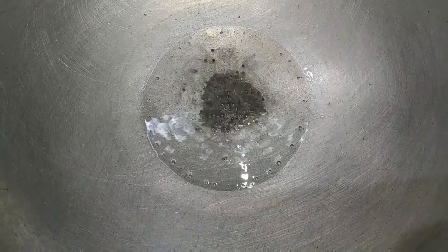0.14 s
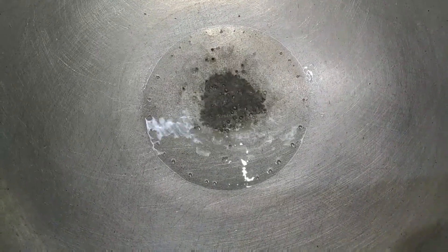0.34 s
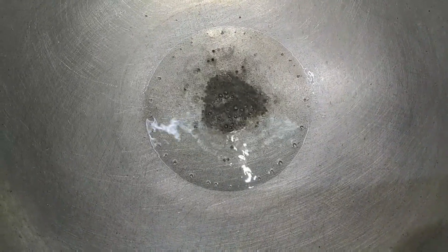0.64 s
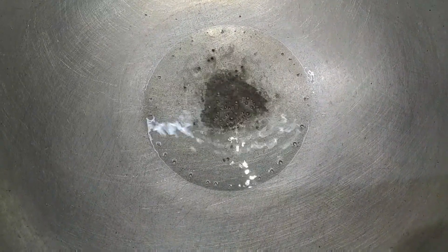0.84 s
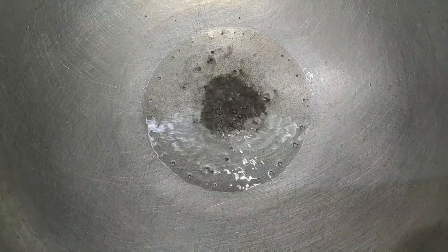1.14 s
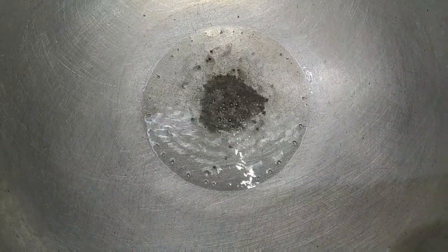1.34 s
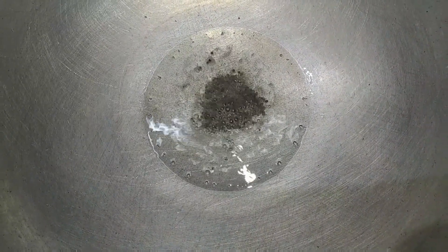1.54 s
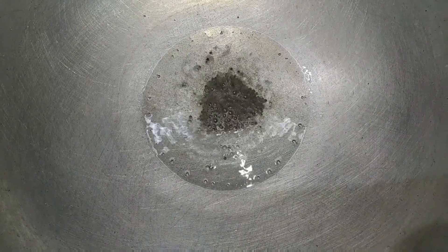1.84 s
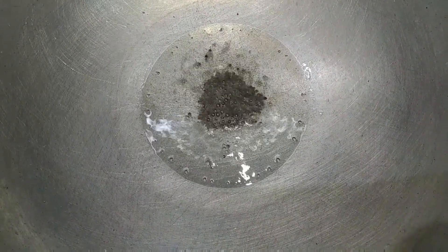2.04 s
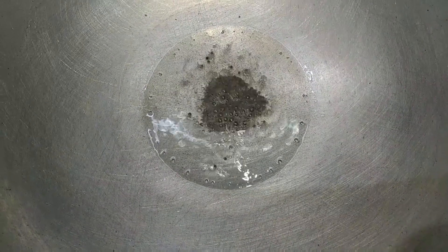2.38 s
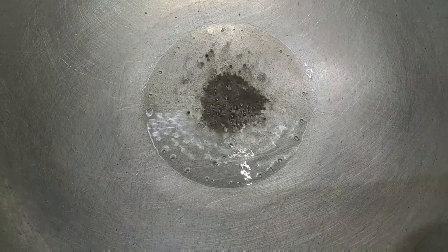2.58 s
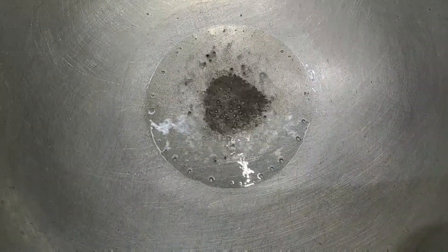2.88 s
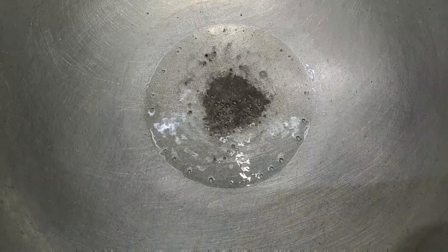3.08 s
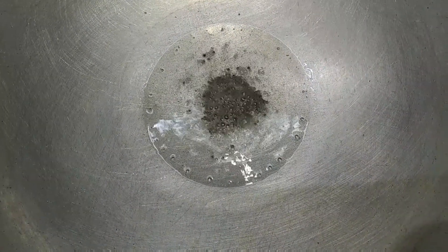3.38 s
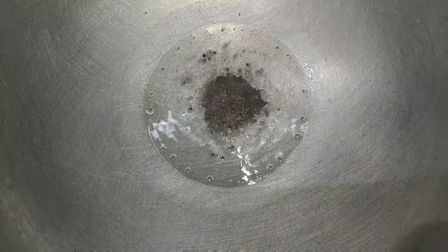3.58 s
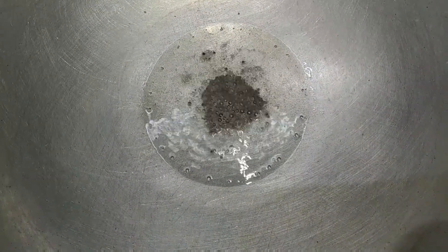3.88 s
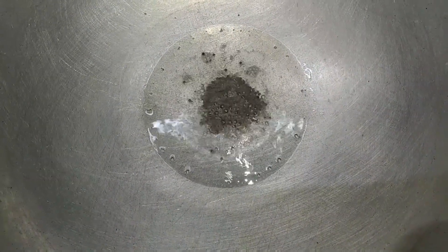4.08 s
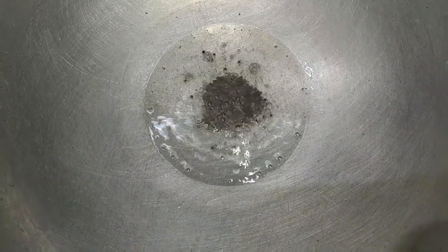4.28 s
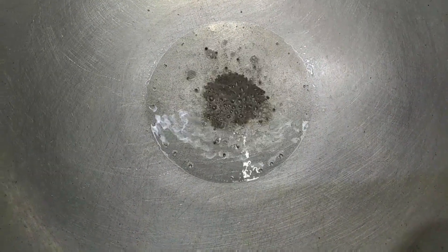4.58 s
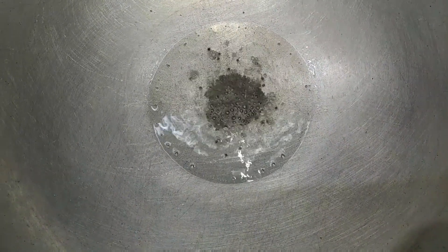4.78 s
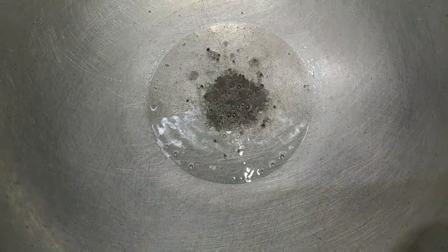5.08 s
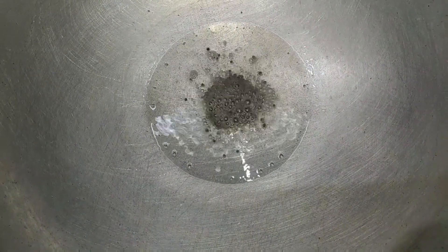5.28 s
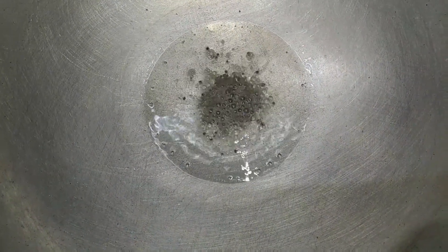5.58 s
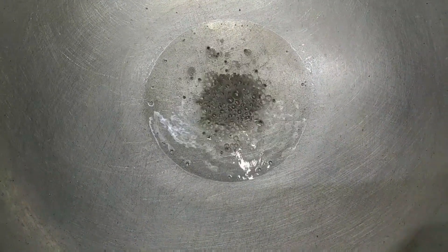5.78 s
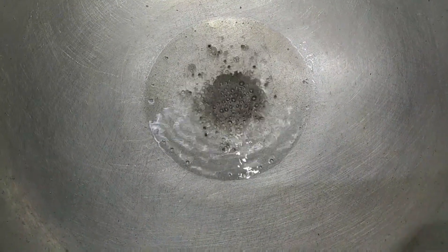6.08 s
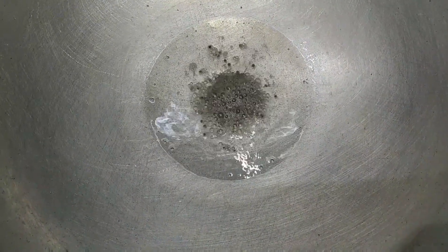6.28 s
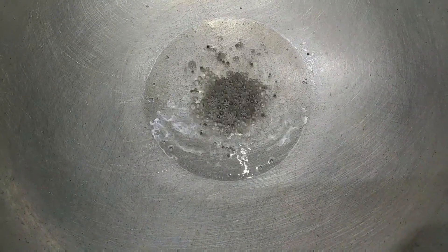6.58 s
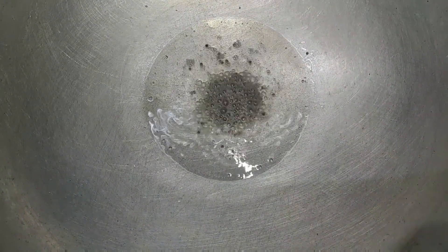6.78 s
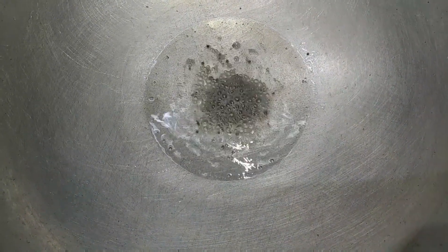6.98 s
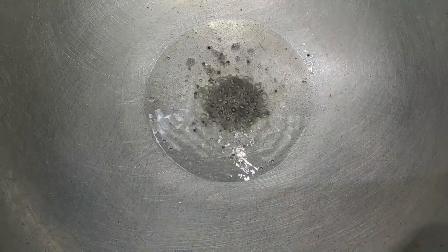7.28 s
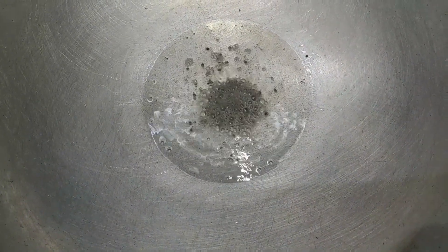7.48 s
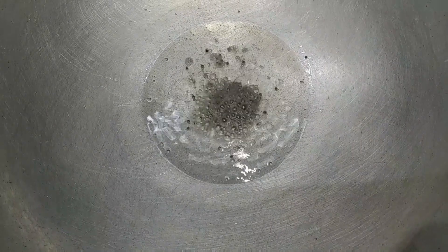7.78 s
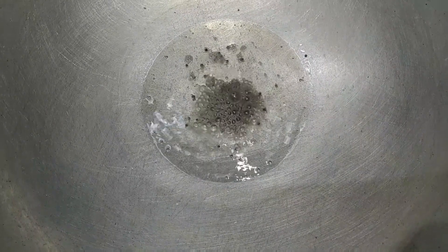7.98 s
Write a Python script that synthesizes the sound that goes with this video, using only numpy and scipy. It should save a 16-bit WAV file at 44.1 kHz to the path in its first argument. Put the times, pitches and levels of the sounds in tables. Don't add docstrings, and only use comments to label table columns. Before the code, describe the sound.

Seeds pop in hot oil in a deep steel pan, sparse faint ticks over soft fizz growing into dense, loud, ringing crackle.

```python
import sys
import numpy as np
from scipy import signal
from scipy.fft import rfft, irfft
from scipy.io import wavfile
from scipy.ndimage import uniform_filter1d

SR = 44100
rng = np.random.default_rng(int(sys.argv[2]) if len(sys.argv) > 2 else 0)


def level_to_linear(level):
    exponent = np.asarray(level, float) / 20
    return 10 ** exponent


def output_pcm(signal):
    pcm = np.clip(np.atleast_2d(signal).T, -1, 1) * 32767
    wavfile.write(sys.argv[1], SR, np.round(pcm).astype(np.int16))


N = 358974

# pitch_hz, level_db (per Hz)
ROOM_COLOUR = [(8.8, -26), (15, 7), (54, -2.5), (148, -2.5), (294, -4), (452, -7.5), (824, -18.5),
               (1230, -13.5), (2060, -13.5), (3750, -16.5), (8360, -16.5), (9650, -7.5), (14000, -76)]
# pitch_hz, width_hz, level_db
HUM_TONES = [(297.4, 12, -73.5), (842, 76, -76)]
# start_s, firing_hz, load_db
FAR_ENGINE = [
    (0.0, 52.6, -73),
    (0.13, 49.9, -76),
    (2.72, 46.44, -69.5),
    (3.63, 49.8, -67),
    (4.87, 49.5, -65.5),
    (6.03, 46.5, -60.5),
    (6.37, 47, -72),
    (6.57, 52.8, -90.5),
    (6.98, 46.7, -82.5),
    (8.14, 43.4, -86),
]
# pitch_hz, likeness (0 to 1)
LEFT_RIGHT_LIKENESS = [(25, 0.7), (125, 1), (250, 0.91), (500, 0.46), (1000, 0.029), (14000, 0.0)]
# start_s, level_db
JET_LEVEL = [(0.0, -59), (0.61, -62), (1.06, -61.5), (1.92, -65), (2.18, -63), (2.79, -70), (4.03, -73.5),
             (4.28, -67), (5.05, -69), (5.76, -62.5), (6.64, -61), (6.82, -58), (7.37, -59.5), (7.8, -56.5),
             (8.14, -55)]
# start_s, level_db
FRYING = [(0.0, -63), (0.68, -66.5), (1.02, -60), (1.31, -63), (1.9, -60.5), (2.27, -51.5), (2.47, -61.5),
          (3.9, -60.5), (4.22, -56.5), (4.85, -59), (5.51, -56), (6.0, -54.5), (6.2, -54.5), (6.53, -54.5),
          (6.87, -53.5), (7.3, -57), (8.14, -52.5)]
# pitch_hz, level_db (per Hz)
FIZZ_BODY_COLOUR = [(350, -51), (600, -8.5), (2040, 2), (2260, 2), (3410, 1.5), (4550, 7), (7000, -38),
                    (9100, 3), (15400, -120)]
# pitch_hz, level_db (per Hz)
FIZZ_TOP_COLOUR = [(2350, -53), (4000, -34), (4940, 3.5), (9390, 3), (13000, -4), (13500, -67),
                   (14600, -90)]
# pitch_hz, fade_s (to -60 dB)
KITCHEN_FADE = [(500, 0.17), (2000, 0.27), (5500, 0.39), (12000, 0.057)]
# pitch_hz, level_db (per Hz)
BURST_COLOUR = [(150, -9.5), (250, -11), (768, -8.5), (865, -10.5), (1570, 0.5), (2020, -1.5), (2240, 0.5),
                (2840, -3.5), (4580, -2), (10200, -10), (13300, -15), (14600, -32), (17000, -66)]
# pitch_hz, width_hz, level_db
STEEL_NOTES = [(1700, 670, -11), (2190, 40, -2), (2590, 45, 0), (3530, 620, -4.5), (4300, 60, 0.5),
               (4640, 230, -1), (5700, 160, -8.5), (5100, 120, -2.5)]
# start_s, peak_db, pitch_hz (hollow note), brightness_db
DRY_SNAPS = [(0.3799, -38.5, 4550, -10), (0.7792, -30, 4400, -12.5), (0.863, -30, 6940, -10),
             (1.7217, -43, 2150, -25), (3.1542, -24.5, 4350, -4.5), (3.2217, -26, 5040, -12.5),
             (3.5924, -34.5, 9100, -7), (4.3434, -19.5, 6840, -15.5), (4.484, -35, 4220, -4.5),
             (4.6755, -20, 4120, -10.5), (5.088, -28, 2380, -41), (5.6824, -28.5, 5500, -17),
             (6.1219, -30, 4540, -15), (6.188, -27, 2690, -10.5), (7.3101, -28, 1556, -28),
             (7.5548, -26, 7960, -1.5), (7.7093, -22.5, 2290, -19), (7.7457, -19.5, 4400, -19.5)]
# start_s, peak_db, pitch_hz (hollow note), brightness_db
FAINT_TICKS = [(0.331, -46, 2630, -18), (0.684, -56, 2010, -6), (1.626, -44.5, 4600, -7),
               (2.2865, -32, 9150, 8), (2.8338, -46, 4680, -9), (2.811, -45, 1900, -25),
               (2.873, -44, 4440, -10), (3.6342, -44.5, 1610, -22), (4.014, -48, 3990, -15),
               (4.3317, -36, 4680, -14), (4.5508, -40, 1700, -21), (4.6873, -35, 3640, -24),
               (4.839, -37.5, 2760, -19), (5.1941, -31.5, 3960, -19), (5.332, -57, 2980, -7),
               (5.377, -41, 1530, -22), (5.531, -28, 1620, -27), (6.2959, -30.5, 7500, -4),
               (6.336, -25, 3800, -20), (6.8208, -41, 7150, 4), (7.562, -35, 7320, -1),
               (7.699, -32.5, 2440, -25)]
# start_s, peak_db, pitch_hz (hollow note), brightness_db
WARMING_POPS = [(0.941, -35, 2360, -26), (1.2386, -43, 4000, -28), (1.545, -33, 4280, -18),
                (2.0954, -43, 8350, -6), (2.1186, -36, 9000, 5), (2.1386, -38, 2315, -25),
                (2.1504, -35, 4200, -26), (2.1652, -36.5, 8950, 5), (2.5458, -35.5, 4900, -15),
                (2.5938, -32.5, 2280, -15), (2.6972, -40.5, 2150, -33), (2.77, -45, 4470, -12),
                (2.799, -37, 8300, -11.5), (2.845, -34.5, 4590, -15), (3.2934, -41.5, 6230, 5),
                (3.376, -29, 3070, -21), (3.5613, -36.5, 6100, -18), (3.762, -34, 4490, -6),
                (4.0431, -26.5, 5050, -13.5), (4.2826, -30.5, 4750, -8.5), (4.316, -23.5, 2580, -12),
                (4.6494, -36.5, 4160, -16), (4.8476, -27.5, 4200, -11)]
# start_s, peak_db, pitch_hz (hollow note), brightness_db
HOT_POPS = [(5.0467, -30.5, 4500, -17), (5.231, -28.5, 5260, -18), (5.3558, -34, 2080, -31),
            (5.396, -22, 4240, -14.5), (5.4483, -30, 3620, -27), (5.4927, -24.5, 4400, -14),
            (5.587, -26, 5730, -19), (5.769, -30.5, 1520, -16), (6.072, -24, 3580, -15),
            (6.2243, -27, 4750, -28), (6.24, -24, 3800, -7.5), (6.6051, -30.5, 4170, -23),
            (6.6264, -29, 4400, -15), (6.6936, -19.5, 5640, -12), (6.7786, -22.5, 2700, -11.5),
            (7.0248, -28, 3040, -17), (7.1573, -27.5, 2730, -14), (7.419, -33, 1700, -28),
            (7.5837, -25.5, 4670, -16), (7.755, -26.5, 5000, -11), (7.7742, -35, 4540, -31),
            (7.8978, -28.5, 4200, -7)]
# start_s, peak_db, pitch_hz (hollow note), brightness_db
WET_SPITS = [(1.2263, -40, 5050, -27), (1.3789, -40, 3700, -31), (2.236, -36, 2354, 8),
             (2.2527, -33.5, 9200, 0), (2.2702, -36.5, 9100, 1), (2.3005, -37.5, 8800, -6),
             (2.3154, -38.5, 7250, -11), (3.899, -43.5, 1550, -19), (3.936, -29.5, 4640, -11),
             (4.0267, -36, 3530, -35), (4.3007, -33, 2654, -3), (4.421, -35, 5100, -17),
             (4.7071, -30, 4180, -10), (4.8159, -43, 1360, -16), (4.965, -36, 3520, -39),
             (5.2756, -35.5, 7700, -11.5), (5.4788, -23, 4600, -11), (5.9035, -31.5, 2330, -11),
             (6.2302, -19, 2190, -24.5), (6.7223, -31.5, 1540, -7), (6.9364, -31, 4700, -16),
             (7.3371, -32, 4640, -20), (7.7363, -28.5, 4510, -34), (8.0065, -35, 1468, -29),
             (8.0802, -32, 3190, -37), (8.1038, -34.5, 3430, -20), (8.1167, -35, 3630, -27)]
# start_s, peak_db, pitch_hz (hollow note), brightness_db, thump_db
BIG_BANGS = [(0.9824, -21, 2560, -7.5, -16.5), (1.0157, -17.5, 3830, -12.5, -16.5),
             (2.3969, -24.5, 2670, -11, -11), (2.639, -25, 2930, -20, -11.5),
             (4.1343, -13.5, 5270, -15, -16), (4.5551, -18.5, 2740, -10.5, -18.5),
             (4.8921, -21.5, 2260, -19, -13.5), (5.1144, -20, 2530, -12.5, -20.5),
             (5.548, -16.5, 2230, -12.5, -22.5), (5.6693, -19, 5830, -24, -24.5),
             (5.9349, -15, 5600, -11.5, -18.5), (6.023, -11, 4640, -11, -24.5),
             (6.3417, -18, 1830, -14.5, -13), (6.3927, -12, 3500, -13.5, -18),
             (6.8688, -16, 2600, -20.5, -17.5), (7.172, -23, 1610, -19, -11),
             (7.2714, -21.5, 1930, -20, -16), (7.467, -20, 2580, -21, -20),
             (7.621, -19.5, 4400, -15.5, -10.5), (7.8579, -15.5, 3600, -10, -16.5)]
# start_s, peak_db, pitch_hz (hollow note), brightness_db
FURTHER_SNAPS = [(2.2113, -43, 9300, -6), (2.3464, -37.5, 2500, -21), (2.3654, -38, 2700, -15),
                 (5.9863, -32, 1960, -16), (6.7, -31, 4600, -17), (6.351, -29, 5500, -22),
                 (6.9, -30.5, 4600, -15), (7.5924, -38, 4170, -12), (7.6304, -31.5, 3400, -17),
                 (6.9375, -29.5, 9000, -1), (4.1405, -24.5, 5000, -20), (6.0295, -23, 5000, -18),
                 (5.9405, -26, 5200, -20), (4.4, -38, 4100, -20), (7.4735, -28, 4000, -20),
                 (6.9445, -36, 5200, -18)]
# start_s, lower_hz, lower_db, upper_hz, upper_db
SPLIT_NOTES = [(0.9824, 4560, 3, 9200, 7), (1.0157, 1810, 8.5, 4480, 7), (2.3969, 2680, 2, 6550, 11),
               (2.639, 1590, 9, 4400, 6), (3.1542, 1210, -7, 7950, -6), (3.2217, 1300, -2, 6000, -3),
               (3.376, 1320, 3, 3350, -7), (3.936, 3050, 5, 4670, 13), (4.0431, 1960, 8, 5130, -1),
               (4.1343, 2250, 6, 5440, 0), (4.316, 2560, 15, 4100, 15.5), (4.3434, 2550, 6.5, 7200, 7),
               (4.5551, 2640, 7.5, 8230, 4.5), (4.674, 3400, 13, 4140, 14), (4.7071, 2600, 11.5, 4060, 18),
               (4.8921, 1760, 1, 8100, -4), (5.1144, 2560, -1, 4970, 4), (5.2306, 3320, 11.5, 5110, -17),
               (5.3955, 2700, 12.5, 4300, -8), (5.4788, 3640, 5, 4450, 8), (5.4933, 1750, -1, 6050, 0),
               (5.548, 1820, 11, 2180, 15), (5.587, 2130, 11, 6240, 15), (5.6693, 2580, 9, 5930, 9),
               (5.9349, 1890, 7.5, 5800, 3), (6.023, 4680, 8, 7400, 2), (6.0716, 1560, 12.5, 3800, -10.5),
               (6.188, 2660, 3, 7950, 2), (6.2302, 4600, -4, 8240, 2), (6.3417, 3500, 4, 4400, 10),
               (6.3927, 1560, 11.5, 4300, 1), (6.6928, 1880, 1, 2530, 10.5), (6.7785, 2520, -7, 7050, -1),
               (6.8688, 2450, -9, 4820, -5), (7.172, 1660, 9, 8200, 8), (7.2714, 1900, 9, 8260, -5),
               (7.467, 2500, 8.5, 4970, 12), (7.5835, 2000, 12, 4940, 4), (7.62, 1950, 15, 4300, 9),
               (7.8579, 2270, 6.5, 2820, 8)]
# start_s, length_share (of the spatter), room_db (reaching the walls)
PAN_SPOTS = [(0.9824, 1.1, -0.5), (1.0157, 1.27, -0.3), (2.3969, 1.1, -0.8), (2.639, 1.24, 0.1),
             (3.1542, 1.5, 1), (3.936, 0.87, -0.5), (4.1343, 1.15, -4.3), (4.3434, 1.2, -2),
             (4.5551, 0.86, -1.5), (4.6755, 1.1, 3.7), (4.8921, 0.93, 0.3), (5.1144, 1.2, 1.3),
             (5.3958, 1.1, -1), (5.4788, 0.89, 0), (5.548, 1.25, -4), (5.6693, 1.4, -1.5),
             (5.9349, 1.1, -2), (6.023, 0.95, -2.5), (6.072, 1.06, -2.3), (6.2302, 0.9, -5), (6.24, 1.4, 2),
             (6.3417, 1.4, -3.5), (6.3927, 0.74, -2.5), (6.6936, 0.86, -1.2), (6.7786, 0.98, -2.5),
             (6.8688, 1.06, 0.7), (7.172, 0.96, 1.7), (7.2714, 0.96, -1), (7.467, 1.37, -0.5),
             (7.5832, 0.76, -2.5), (7.62, 0.88, -2.5), (7.7457, 0.91, -0.5), (7.8579, 1.06, -0.3)]
# pitch_hz, note_db
POCKET_NOTE = [(1550, 14), (1650, 3.5)]
# pitch_hz, left_minus_right_db
RIM_LEAN = [(1100, -2.5), (1700, 2), (2300, 2), (3000, -4.5), (4300, -1.5), (9000, -0.5), (13000, 4)]
# pitch_hz, level_db
HOLES_UNDER = [(600, -14), (1500, -3.8), (3000, -1.5), (5000, -2.5), (9000, -2.6), (10000, -3.5),
               (11000, -2.5), (14000, -2.5)]
# pitch_hz, level_db (per bin)
HOLES_LOWEST = [(1500, -104), (2500, -95), (3600, -99), (4600, -97), (7000, -95), (9000, -100)]


def rms_one(x):
    return x / np.sqrt(np.mean(x ** 2, axis=-1, keepdims=True) + 1e-20)


def in_time(rows):
    s, *columns = np.transpose(rows)
    return [np.interp(np.arange(N) / SR, s, c) for c in columns]


def at_hz(points, hz):
    table_hz, values = np.array(points).T[:2]
    return np.interp(np.log(hz + 1), np.log(table_hz), values)


def near(rows, s):
    return [rest for at_s, *rest in rows if abs(at_s - s) < 0.003]


def drift(rate_hz):
    r = np.exp(-80 * np.pi * rate_hz / SR)
    slow = signal.lfilter([1], [1, -2 * r, r * r], rng.standard_normal(N // 40 + 2002))[2000:]
    return np.interp(np.arange(N) / 40, np.arange(len(slow)), rms_one(slow))


def resonate(x, hz, width_hz):
    r = np.exp(-np.pi * width_hz / SR)
    return signal.lfilter([(1 - r * r) / 2, 0, (r * r - 1) / 2], [1, -2 * r * np.cos(2 * np.pi * hz / SR), r * r], x)


def coloured(pair, spectrum):
    hz = np.arange(N // 2 + 1) * SR / N
    mid, side = rfft(pair) * level_to_linear(at_hz(spectrum, hz))
    alike = np.clip(at_hz(LEFT_RIGHT_LIKENESS, hz), 0, 1)
    both = np.sqrt(1 + alike) * mid + np.sqrt(1 - alike) * side * [[1], [-1]]
    return rms_one(irfft(both, N))


def grains(shape, share, spread_db, most=5.0):
    sizes = level_to_linear(spread_db * np.minimum(rng.exponential(1, shape), most)) * rng.choice([-1, 1], shape)
    return sizes * (rng.random(shape) < share)


def engine():
    hz, first_db = in_time(FAR_ENGINE)
    labour = np.exp(-((np.arange(N) / SR - 2.47) / 0.79) ** 2)
    upper_db = -80 + 12.5 * labour + 2.5 * drift(19)
    turn = 2 * np.pi * np.cumsum(hz) / SR
    upper = np.sin(2 * turn) + 0.47 * np.sin(3 * turn)
    orders = level_to_linear(first_db) * np.sin(turn) + level_to_linear(upper_db) * upper
    return np.sqrt(2) * orders * level_to_linear(1.05 * drift(8.0))


def room():
    air_db, motor_hz, motor_db = -60.5, 181, -70.5
    air = level_to_linear(air_db) * coloured(rng.standard_normal((2, N)), ROOM_COLOUR)
    tones = sum(level_to_linear(db) * rms_one(resonate(rng.standard_normal(N), hz, w)) for hz, w, db in HUM_TONES)
    turn = 2 * np.pi * np.cumsum(motor_hz + 2.17 * drift(8.46)) / SR
    motor = level_to_linear(motor_db + 2 * drift(6.2)) * np.sqrt(2) * np.sin(turn + np.array([[0], [0.6]]))
    return air + (tones + motor) * level_to_linear([[-0.7], [0.7]])


def gas_jet():
    jet_hz, width_hz = 9875, 520
    hiss = resonate(rng.standard_normal((2, N)), jet_hz, width_hz)
    hiss = resonate(hiss, jet_hz, width_hz)
    return level_to_linear(in_time(JET_LEVEL)[0] + 1.3 * drift(0.8)) * rms_one(hiss)


def fizz():
    body_db, = in_time(FRYING)
    late = np.arange(N) / SR - 2.33
    vent_db = 4.5 * np.exp(-(late / np.where(late < 0, 0.1, 0.04)) ** 2)
    top_db = -56 + 0.95 * (body_db + 54) + vent_db
    clumps = level_to_linear(6.7 * drift(12))
    body = rms_one(grains((2, N), 0.086 * clumps, 5.0, 5.1)) + 0.65 * rng.standard_normal((2, N))
    top = rms_one(grains((2, N), 0.045 * clumps, 4.9, 2.4)) + 1.4 * rng.standard_normal((2, N))
    body = level_to_linear(body_db - 2.5 + 0.5 * drift(79)) * coloured(body, FIZZ_BODY_COLOUR)
    return body + level_to_linear(top_db + 3.0 + 2.0 * drift(46)) * coloured(top, FIZZ_TOP_COLOUR)


def kitchen(x, size=20000):
    wall_s, before_wall = 0.0095, 0.41
    t, tail = np.arange(size) / SR, 0
    for hz in 400 * 2 ** np.arange(0, 5.4, 0.5):
        band = signal.butter(2, [hz / 2 ** 0.39, hz * 2 ** 0.41], "band", fs=SR, output="sos")
        noise = signal.sosfilt(band, rng.standard_normal((2, size)))
        tail = tail + noise * level_to_linear(-60 * t / at_hz(KITCHEN_FADE, hz))
    tail = tail * (1 - np.exp(-t / 0.00028)) * np.interp(t - wall_s, [-0.001, 0.001], [before_wall, 1])
    tail = tail / np.sqrt(np.sum(tail ** 2, axis=1, keepdims=True))
    return signal.fftconvolve(x, tail, axes=1)[:, :N]


def spatter(t60_s, size):
    t, open_s = np.arange(size) / SR - 0.004, 0.0007
    creak_db_per_s = 4202 * level_to_linear(1.5 * rng.standard_normal())
    ragged = level_to_linear(np.clip(500 * t, 1.5, 3) * np.repeat(rng.standard_normal(size // 64), 64))
    fading = level_to_linear(-60 * t / t60_s) * ragged * (1 - 0.55 * np.exp(-np.abs(t) / open_s))
    swell = np.where(t < 0, level_to_linear(-8.5 + creak_db_per_s * t), fading)
    crack = 0.48 * np.exp(-((t - open_s) / 0.00029) ** 2)
    clicks = grains((2, size), 0.5, 2, 3) + 0.5 * rng.standard_normal((2, size))
    spray = (swell + crack) * clicks
    dull = signal.lfilter(*signal.butter(2, 6500, fs=SR), spray)
    return dull + (spray - dull) * level_to_linear(-700 * np.maximum(t, 0))


def husk_colour(spray, low_db, high_db, unevenness):
    size = spray.shape[1]
    hz = np.arange(size // 2 + 1) * SR / size
    tilt = [(1700, low_db + 14.0), (2800, 0), (5500, 0.045), (8000, high_db + 17.5),
            (12500, high_db + 15.5), (14500, min(5.5 * high_db + 37, 3.0))]
    patch_db = unevenness * 2.5 * rng.standard_normal(36) * np.hanning(38)[1:-1] ** 0.5
    patches = np.transpose([np.geomspace(800, 14000, num=36), patch_db])
    plain = rfft(spray) * level_to_linear(at_hz(BURST_COLOUR, hz) + at_hz(tilt, hz))
    return irfft(plain, size), irfft(plain * level_to_linear(at_hz(patches, hz)), size)


def ringing(spray, note_hz, notes, unevenness):
    strengths = level_to_linear(rng.normal(0, 2.6 * unevenness, (len(STEEL_NOTES), 2, 1)))
    steel = sum(g * level_to_linear(db + 3.0) * resonate(spray, f, 1.01 * w) for (f, w, db), g in zip(STEEL_NOTES, strengths))
    pocket_db = at_hz(POCKET_NOTE, note_hz) - 1.1 * len(notes) / 2
    pocket = level_to_linear(pocket_db) * resonate(spray, note_hz, note_hz / 4.6)
    notes = notes or [(f, level_to_linear(-3.0)) for f in 1500 * 6 ** rng.random(2)]
    husk = sum(g * resonate(spray, f, f / 13) for f, g in notes)
    return spray + steel + pocket + husk


def pops(size=4096, count=6):
    direct, escaping = np.zeros((2, N + size)), np.zeros((count, 2, N + size))
    kinds = [(DRY_SNAPS + FAINT_TICKS, 0.015), (WARMING_POPS + HOT_POPS, 0.039), (WET_SPITS, 0.088),
             (BIG_BANGS, 0.024), (FURTHER_SNAPS, 0.015)]
    for t60_s, row in [(t60_s, row) for rows, t60_s in kinds for row in rows]:
        s, peak_db, note_hz, high_db, *thump_db = row
        low_db = thump_db[0] if thump_db else -16 - 2.5 * np.log2(note_hz / 3500)
        pan_db = rng.normal(-0.6, 1.2)
        longer, room_db = (near(PAN_SPOTS, s) or [(1, 0)])[0]
        notes = [(f, level_to_linear(db)) for two in near(SPLIT_NOTES, s) for f, db in (two[:2], two[2:])]
        unevenness = 0.5 if notes else 1

        spray = spatter(np.clip(t60_s * longer, 0.008, 0.2), size)
        plain, spray = husk_colour(spray, low_db, high_db, unevenness)
        burst = ringing(spray, note_hz, notes, unevenness)

        height = np.sqrt(np.max(uniform_filter1d(np.mean(burst ** 2, axis=0), size=90)))
        gain = level_to_linear(peak_db - 5.5 + pan_db * np.array([[0.5], [-0.5]])) / height
        at = max(round((s - 0.0035) * SR), 0)
        direct[:, at:at + size] += gain * burst
        outward = plain + 0.2 * (burst - plain)
        escaping[rng.integers(count), :, at:at + size] += level_to_linear(room_db) * gain * outward
    return direct[:, :N], escaping[:, :, :N]


def leaned(x):
    hz = np.arange(N // 2 + 1) * SR / N
    return irfft(rfft(x) * level_to_linear(at_hz(RIM_LEAN, hz) * np.array([[0.5], [-0.5]])), N)


def scene():
    seeds, escaping = pops()
    echoes = level_to_linear(-7.0) * sum(kitchen(spot) for spot in escaping)
    return engine() + room() + gas_jet() + fizz() + leaned(seeds + echoes)


def shut_weak(x, size, cracks, on_cracks):
    treble_hz = 10500
    hz, s, frames = signal.stft(x, SR, "hann", size, size // 2)
    power = np.mean(np.abs(frames) ** 2, axis=0)
    at = np.minimum((s * SR).astype(int), N - 1)
    treble = hz[:, None] > treble_hz
    under_db = at_hz(HOLES_UNDER, hz)[:, None]

    def smooth(bins):
        return uniform_filter1d(power, size=bins, axis=0)

    narrow, wide = smooth(3 + size // 1024), smooth(size // 32)
    shut = narrow < wide * level_to_linear(2 * under_db)
    shut |= smooth(size // 160) * size / 2048 < level_to_linear(2 * at_hz(HOLES_LOWEST, hz))[:, None]
    middle = np.median(power[(hz > 3000) & (hz < treble_hz)], axis=0)
    treble_db = -9.3 + 1.6 * drift(6.0)[at]
    shut |= treble & (smooth(size // 64) < middle * level_to_linear(2 * treble_db))
    shut |= np.roll(shut, 1, axis=1)
    loud = power[hz > 1000].sum(axis=0)
    shut &= loud < 3 * np.roll(loud, 2)
    very_weak = narrow < wide * level_to_linear(2 * (under_db - 3.5))
    shut &= (loud < 5 * np.median(loud)) | very_weak | treble
    hidden = wide < np.roll(wide, 2, axis=1) * level_to_linear(2 * -13)
    hidden |= wide < np.roll(wide, -2, axis=1) * level_to_linear(2 * -19)
    shut |= hidden & on_cracks & (wide < 0.85 * smooth(size // 10)) & (hz[:, None] > 2500)
    shut &= cracks[at] == on_cracks
    return signal.istft(frames * ~shut, SR, "hann", size, size // 2)[1][:, :N]


def hollow_out(x):
    level = uniform_filter1d(np.sum(np.diff(x, prepend=0) ** 2, axis=0), size=128)
    sudden = level > 8 * np.roll(uniform_filter1d(level, size=1024), 700)
    cracks = uniform_filter1d(1.0 * sudden, size=1600) > 1e-6
    x = shut_weak(x, size=2048, cracks=cracks, on_cracks=False)
    return shut_weak(x, size=512, cracks=cracks, on_cracks=True)


def band_limit(x):
    return signal.sosfilt(signal.butter(12, 17000, fs=SR, output="sos"), x)


def record(dry):
    mix = hollow_out(dry)
    return band_limit(mix)


dry = scene()
out = record(dry)
output_pcm(out)
```